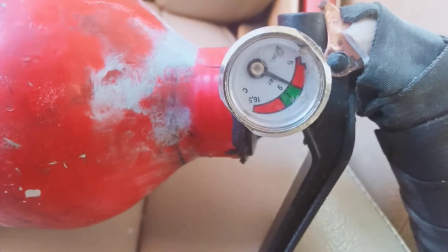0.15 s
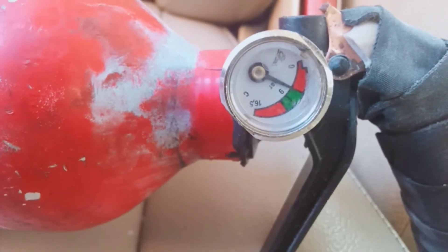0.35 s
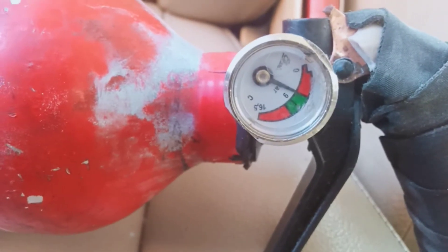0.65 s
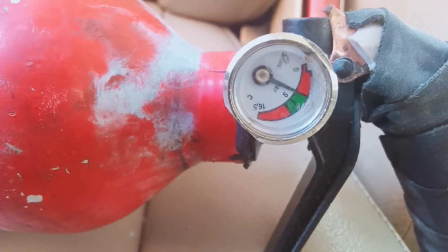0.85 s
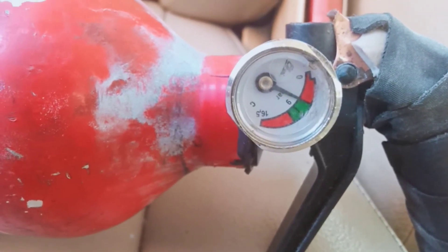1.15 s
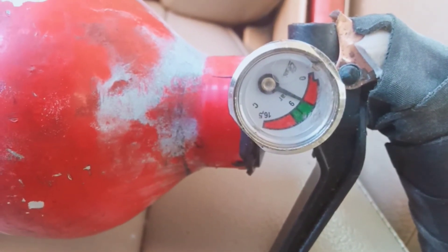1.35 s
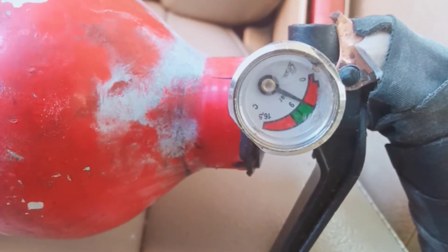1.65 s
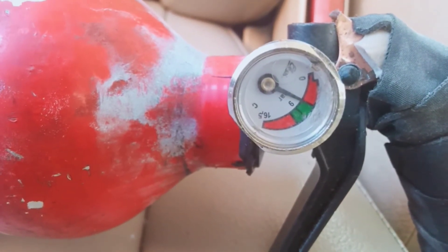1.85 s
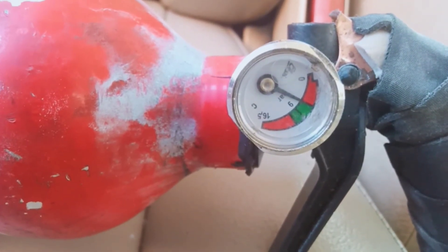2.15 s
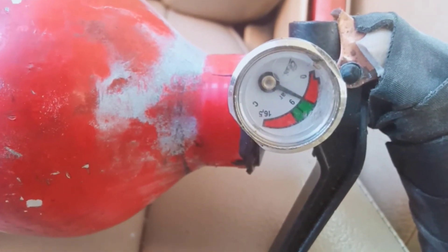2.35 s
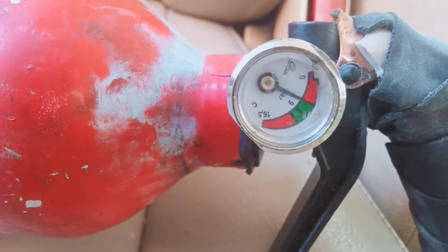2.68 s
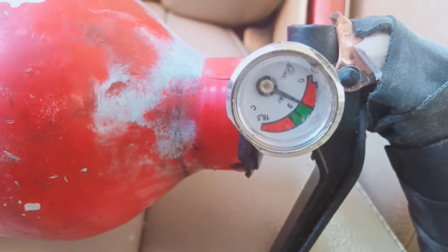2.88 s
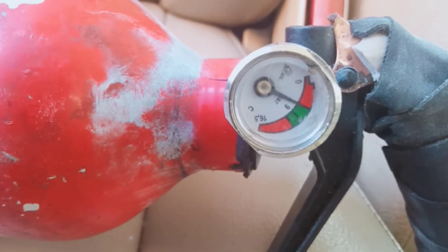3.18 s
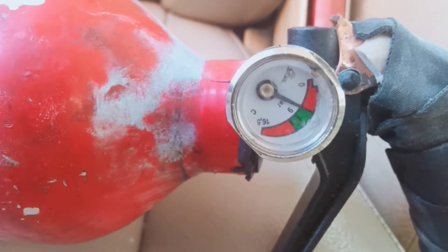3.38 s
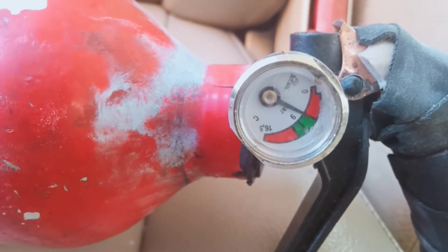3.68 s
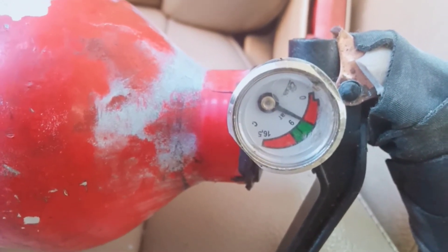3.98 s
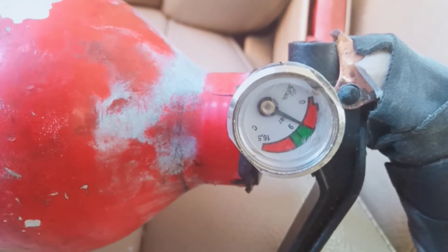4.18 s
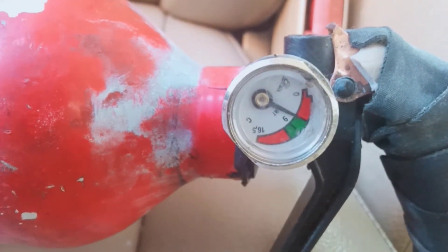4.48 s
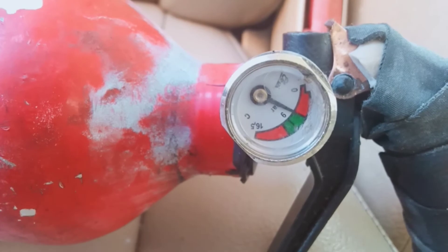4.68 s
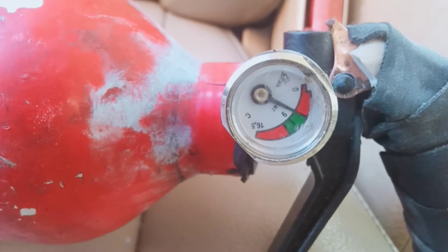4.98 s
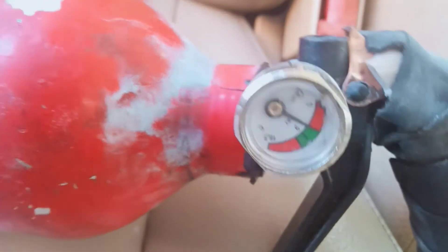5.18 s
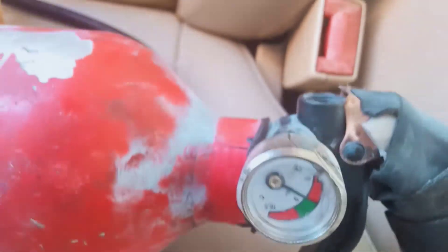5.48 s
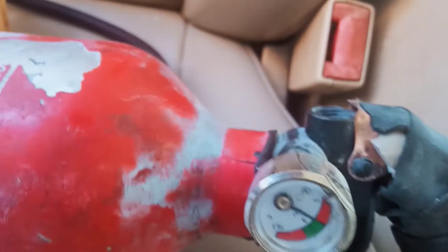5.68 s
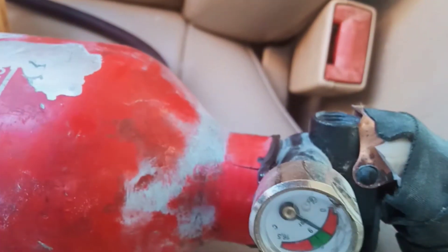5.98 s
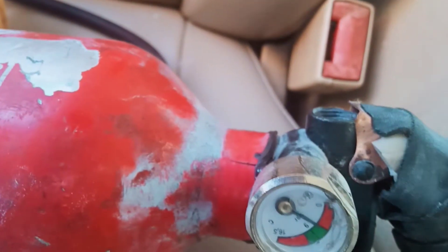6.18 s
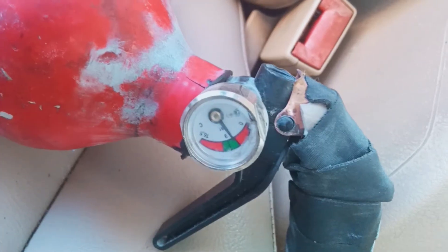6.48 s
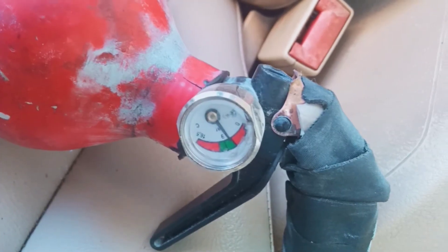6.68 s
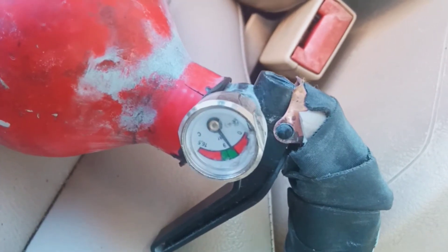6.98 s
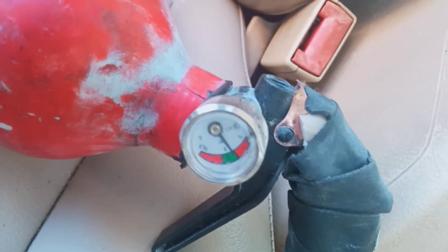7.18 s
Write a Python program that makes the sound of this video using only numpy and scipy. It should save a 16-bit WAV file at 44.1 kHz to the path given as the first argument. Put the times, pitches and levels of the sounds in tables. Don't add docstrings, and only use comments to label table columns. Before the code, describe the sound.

From the very start a small piston air compressor is already running at full speed, close to the microphone in a parked car's cabin. About sixty pump strokes a second fuse into a coarse, level buzz, strongest around 600 to 700 Hz, with hard metallic knocks, fast valve ticks and a piercing airy whistle near 6 kHz pulsing on each stroke. Motor whirr fills in beneath, and a very faint low engine idle sits under everything. Pitch and loudness barely waver. Around 5.2 to 5.6 seconds the upper tone changes subtly as the microphone swings aside. At about 6.15 the sound stops dead, leaving roughly 0.2 seconds of silence. Near 6.37 it snaps back at almost the same pitch, from further away: similar body, hollower, with much less whistle and a slightly softer hiss. It continues unchanged until the abrupt end around 7.3 seconds.

```python
import sys
import numpy as np
from scipy import signal
from scipy.fft import rfft, irfft, next_fast_len
from scipy.io import wavfile

SR = 44100
rng = np.random.default_rng(int(sys.argv[2]) if len(sys.argv) > 2 else 0)


def undo_db(level):
    steps = np.asarray(level, float) / 20
    return 10 ** steps


def log_audio(samples):
    frames = np.atleast_2d(samples).T
    limited = np.clip(frames, -1, 1)
    pcm = np.round(limited * 32767).astype(np.int16)
    wavfile.write(sys.argv[1], SR, pcm)


N = 323694
TIME = np.arange(N) / SR
CUT_S, RETURN_S, FULL_S = 6.1535, 6.365, 6.3765

# [t/s, rate/(turns per s)]
CRANK_SPEED = [(0, 60.54), (.33, 60.82), (.6, 60.66), (1.07, 60.57), (1.27, 60.82), (1.54, 60.48),
               (1.7, 60.66), (3.05, 60.65), (3.7, 60.41), (4.17, 60.43), (4.33, 60.6), (5.2, 60.74),
               (5.65, 60.67), (6.15, 60.88), (6.37, 61.12), (6.75, 61.09), (6.87, 60.97), (7.34, 60.95)]
# [multiple of crank rate, level/dB]
PUFF_NEAR = [(1, -23.5), (2, -11.5), (3, -13), (4, -10), (5, -9), (6, -20), (7, -16), (8, -17), (9, -8.5),
             (10, -1.5), (11, 1.5), (12, -4.5), (13, -9.5), (14, -11), (15, -28.5), (16, -21), (17, -31),
             (20, -27)]
PUFF_FAR = [(1, -26.5), (2, -15), (3, -11.5), (4, -17), (5, -14), (6, -19), (7, -23), (8, -14.5), (9, -10),
            (10, -4), (11, 0), (12, -4), (13, -17), (14, -15), (15, -30.5)]
# [crank angle/turn, mode f/Hz, width/Hz, peak level/dB over its band]
KNOCKS_NEAR = [(.03, 2090, 243, -17.5), (.33, 1528, 369, -13.5), (0.419, 1108, 144, -16),
               (.43, 1650, 357, -9.5), (0.589, 1725, 339.5, -13), (.64, 1599, 355.5, -6.5),
               (0.681, 2068, 364, -9.5), (.8, 1265, 297, -12), (0.919, 1680, 391, -10),
               (0.171, 2800, 244.6, -10), (.32, 2800, 309.4, -14), (0.409, 2852, 339.6, -7.5),
               (.73, 2945, 348.6, -8.5), (.83, 3070, 254, -11), (.9, 2770, 314.6, -3.5),
               (.12, 4790, 305, -10.5), (.35, 4800, 296, -16), (0.768, 4800, 351, -3),
               (0.781, 4240, 478, -10), (.92, 4520, 411, -13.5)]
KNOCKS_FAR = [(.04, 1510, 345, -15), (.27, 1320, 296, -9.5), (.46, 1820, 545, -2),
              (0.601, 1145, 147.3, -11.5), (.73, 2010, 404, -9), (.08, 2800, 350, -14),
              (0.351, 2800, 308, -15), (.5, 2790, 295, -7), (0.781, 2730, 251, -2.5),
              (.85, 3070, 70.1, -24), (0.889, 2800, 292, -10.5), (.18, 4700, 404, -9),
              (.36, 4600, 300, -10), (.51, 4700, 303, -9), (.75, 4790, 200, -6.5), (.75, 4460, 149, -11.5),
              (.91, 4750, 301, -12)]
# [crank angle/turn, mode f/Hz, width/Hz, peak level/dB over its band, size scatter/dB]
TICKS_NEAR = [
    (.2, 6360, 249, 0, 0),
    (.78, 6200, 393, -0.5, 0.5),
    (.89, 5700, 200, -3.5, 1.5),
    (0.88, 6420, 250, 9, 0.3),
    (.68, 7900, 600, 1, -0.5),
    (.798, 7900, 600, 6, 3.5),
]
TICKS_FAR = [
    (.73, 6000, 600, 12.5, 1.5),
    (.68, 5500, 600, 5, 1.5),
    (.83, 5700, 600, 9, 1.5),
    (.44, 5750, 500, 5, 3.4),
    (.36, 6500, 780, 8, 3.5),
    (.37, 7170, 600, 15, 4.2),
    (.65, 7860, 700, 7, 3.3),
    (.385, 11000, 800, 3, 3),
    (.385, 14800, 1000, -6, 3),
]
# [resonance f/Hz, width/Hz, rms level/dB over its band,
# opening angle/turn, open share/turn, leak level/dB]
JETS_NEAR = [(6428, 257, -1.5, 0.96, 0.43, -10), (6087, 130, -9, 0.85, 0.46, -11.5),
             (5660, 134, -16.5, 1, 0.6, -5), (4790, 300, -17.5, 0.81, 0.82, -3),
             (3780, 740, -22.5, 0.73, 0.5, 2), (2830, 360, -22, 0.17, .7, 5.5),
             (7900, 760, -3.5, .85, .6, -3.5), (8490, 420, -10.5, .85, 0.45, -14.5),
             (10060, 900, -9, 0.05, 0.23, -4.5), (11480, 690, -5, 0.02, .27, -8.5),
             (12500, 700, -16, 0.92, .27, -5), (14950, 450, -12, .01, .24, -9.5),
             (13900, 930, -19.5, .01, .3, -5)]
JETS_FAR = [(6620, 660, 6, .7, .55, -3.5), (5720, 500, -12, 0.41, .35, -5), (4700, 330, -20, .7, .7, 2),
            (3780, 400, -27, 0.88, .7, 5), (2800, 180, -22, 0.034, 0.78, 5), (970, 81, -32.5, .7, .7, 0),
            (7300, 700, -10.5, .95, .3, -7.5), (8400, 700, 0, .95, 0.37, -4.5),
            (10300, 1500, -9, .97, .28, -3.5), (12400, 1100, -7.5, .97, .28, -7),
            (15100, 1500, -12.5, .0, .3, -2.5)]
# [f/Hz, level/dB per Hz]
MOTOR_NEAR = [(18, -59.5), (45, -16.5), (301, -14.5), (459, -16), (662, -9), (931, -14.5), (1530, -15.5),
              (2390, -15), (2800, -30.5), (3450, -34), (5250, -32.5), (6310, -14.5), (7390, -32),
              (11500, -45), (15800, -45.5)]
MOTOR_FAR = [(18, -60), (45, -21), (178, -16.5), (435, -20), (662, -10), (860, -15), (981, -36),
             (1120, -18), (2520, -15.5), (2730, -25), (3360, -39), (4610, -25), (5120, -36), (6480, -29),
             (15800, -52)]
# [f/Hz, width/Hz, level/dB]
BELLS_NEAR = [(975, 130, -6), (1095, 60, 4), (1275, 50, 2), (1515, 60, 4), (2180, 70, -5), (2420, 180, -7),
              (2790, 50, 6), (2852, 50, -6), (5250, 220, 3), (6800, 150, -4), (7000, 110, 3),
              (8270, 140, -5), (9400, 250, -3), (7520, 90, -4)]
BELLS_FAR = [(1650, 100, -10.5), (2100, 80, -1.5), (2580, 90, -15), (3750, 140, -2.5), (4100, 200, 3),
             (4480, 90, 2.5), (4520, 70, -3.5), (4800, 100, 1.5), (5450, 220, 4), (6490, 70, -6.5),
             (6600, 110, 4), (6870, 100, -1), (8650, 150, -3), (12200, 500, 3.5)]
# [f/Hz, level/dB]
SWUNG_COLOUR = [(2900, 0.5), (3300, -4.5), (3900, -2), (4450, 4.5), (4850, -4.5), (5300, -0.5), (6500, -2),
                (7300, 5), (7800, 1), (10500, 1), (11300, -3.5), (12000, 3), (13000, 1), (14400, 0)]


def unit(x):
    return x / np.sqrt(np.mean(x ** 2) + 1e-20)


def wobble(rate, size):
    knots = rng.standard_normal(int(size * rate / SR) + 4)
    return np.interp(TIME[:size] * rate, np.arange(len(knots)), knots)


def coloured(gain, size):
    m = next_fast_len(size)
    spectrum = rfft(rng.standard_normal(m)) * gain(np.fft.rfftfreq(m, 1 / SR))
    return unit(irfft(spectrum, m)[:size])


def idling_car():
    firing_hz, hum_db, rumble_hz, rumble_db = 55, -58, 20, -60
    turns = np.cumsum(firing_hz + .5 * wobble(1.8, size=N)) / SR
    hum = np.sqrt(2) * np.sin(2 * np.pi * turns) * undo_db(2.5 * wobble(3, size=N))
    rumble = coloured(lambda f: f / (rumble_hz ** 2 + f * f) * (f > 8), size=N)
    return undo_db(hum_db) * hum + undo_db(rumble_db) * rumble


def narrow_bells(x, bells):
    m = next_fast_len(len(x) + SR // 10)
    f = np.fft.rfftfreq(m, 1 / SR)
    response = 1
    for hz, width, db in bells:
        off = hz * hz - f * f
        damping = 1j * f * width
        response = response * (off + damping * undo_db(db / 2)) / (off + damping / undo_db(db / 2))
    return irfft(rfft(x, m) * response, m)[:len(x)]


def swing_microphone(x):
    hz, db = np.transpose(SWUNG_COLOUR)
    m = next_fast_len(len(x))
    colour = undo_db(np.interp(np.fft.rfftfreq(m, 1 / SR), hz, db))
    aside = irfft(rfft(x, m) * colour, m)[:len(x)]
    swing = np.interp(TIME[:len(x)], (5.23, 5.58), [0, 1])
    return x + swing * (aside - x)


def motor_whirr(spectrum, size):
    hz, db = np.transpose(spectrum)
    return coloured(lambda f: undo_db(np.interp(np.log(f + 1), np.log(hz), db)), size)


def jet(turns, hz, width, opens, share, leak_db):
    size, edge = len(turns), .08
    off_centre = np.abs((turns - opens - share / 2 + .5) % 1 - .5)
    valve = np.clip((share / 2 - off_centre) / edge + .5, 0, 1)
    air = coloured(lambda f: 1 / (1 + ((f - hz) / width) ** 2) ** 1.4, size)
    return unit(air * undo_db(leak_db * (1 - valve) + 1.3 * wobble(40, size)))


def knock(turns, angle, hz, width, scatter_db):
    jitter_s, creep_s = 1e-5, 2.5e-5
    size = len(turns)
    whole = np.arange(np.ceil(turns[0] - angle), turns[-1] - angle)
    chance = rng.standard_normal((len(whole), 2))
    rise = 1 / (np.pi * width)
    at = np.interp(whole + angle, turns, TIME[:size]) - rise + jitter_s * chance[:, 0]
    play = creep_s * wobble(.8, size)
    at = at + play[(at * SR).astype(int).clip(0, size - 1)]
    places = np.clip(np.round(at * SR).astype(int), 0, size - 1)
    blows = np.bincount(places, undo_db(scatter_db * chance[:, 1]), size)
    t = TIME[:SR // 40]
    ring = t / rise * np.exp(1 - t / rise) * np.sin(2 * np.pi * hz * t)
    return signal.oaconvolve(blows, ring)[:size]


def puff(turns, orders, early):
    size = len(turns)
    low, high, cavity = early
    shaky = turns - .5 + .0009 * wobble(45, size)
    tone = np.zeros(size)
    for k, db in orders:
        if k < 7:
            lead = .24 + low * (k - 1) - .2 * (k == 3)
        else:
            lead = .1 + high * min(k, cavity) - .1 * (k > 11)
        tone += undo_db(db + .6 * wobble(3, size)) * np.cos(2 * np.pi * (k * shaky + lead))
    return unit(tone) * undo_db(.62 * wobble(70, size))


def compressor(time, levels_db, orders, early, knocks, ticks, jets, motor, puff_s):
    size = len(time)
    turns = np.cumsum(np.interp(time, *np.transpose(CRANK_SPEED))) / SR
    turns = turns - np.interp(puff_s, time, turns) + .5
    bands = np.zeros((3, size))

    def band(hz):
        return int(hz > 5300) + int(hz > 7000)

    heavy = [(*row, .7) for row in knocks]
    for angle, hz, width, db, scatter_db in heavy + ticks:
        drift_db = .82 * wobble(1.14, size)
        bands[band(hz)] += undo_db(db + drift_db) * knock(turns, angle, hz, width, scatter_db)
    for hz, width, db, opens, share, leak_db in jets:
        bands[band(hz)] += undo_db(db) * jet(turns, hz, width, opens, share, leak_db)
    bands[0] += undo_db(1.12) * puff(turns, orders, early)
    bands[0] += undo_db(-14.5) * motor_whirr(motor, size)
    return undo_db(np.array(levels_db)) @ bands


def scene():
    cut = round(CUT_S * SR)
    near = compressor(TIME[:cut], (-21.5, -21.5, -32), PUFF_NEAR, (.09, .145, 10),
                      KNOCKS_NEAR, TICKS_NEAR, JETS_NEAR, MOTOR_NEAR, puff_s=.009)
    far = compressor(TIME[cut:], (-21, -36.5, -35.5), PUFF_FAR, (.13, .16, 9.5),
                     KNOCKS_FAR, TICKS_FAR, JETS_FAR, MOTOR_FAR, puff_s=6.37954)
    near = swing_microphone(narrow_bells(near, BELLS_NEAR))
    far = narrow_bells(far, BELLS_FAR)
    return (np.concatenate([near, far]) + idling_car())[None]


def roll_off(x):
    return signal.sosfilt(signal.butter(12, 16750, fs=SR, output="sos"), x)


def record(dry):
    rounded = dry / (1 + np.abs(dry / .58) ** 6) ** (1 / 6)
    hz = np.fft.rfftfreq(N, 1 / SR)
    top_db = np.interp(hz, [15450, 15840, 15870], [0, -36, -120])
    limited = irfft(rfft(rounded) * undo_db(top_db), N)
    moments = [CUT_S - .0004, CUT_S, RETURN_S, RETURN_S + .003, FULL_S - .0012, FULL_S]
    change = np.interp(TIME, moments, [1, 0, 0, .17, .2, 1])
    return roll_off(limited * change)


dry = scene()
out = record(dry)
log_audio(out)
```